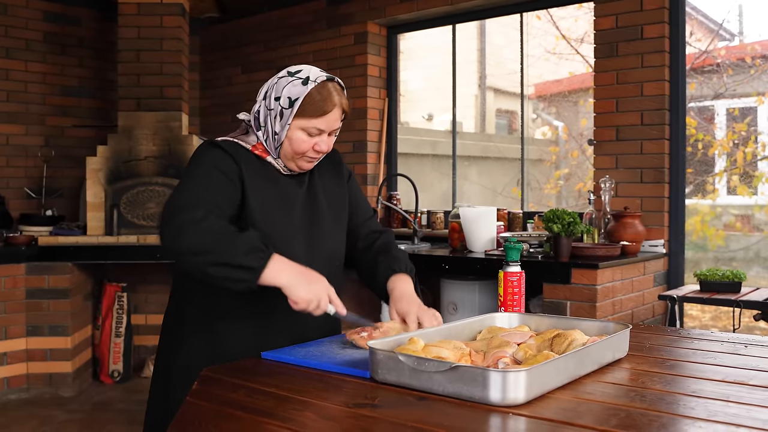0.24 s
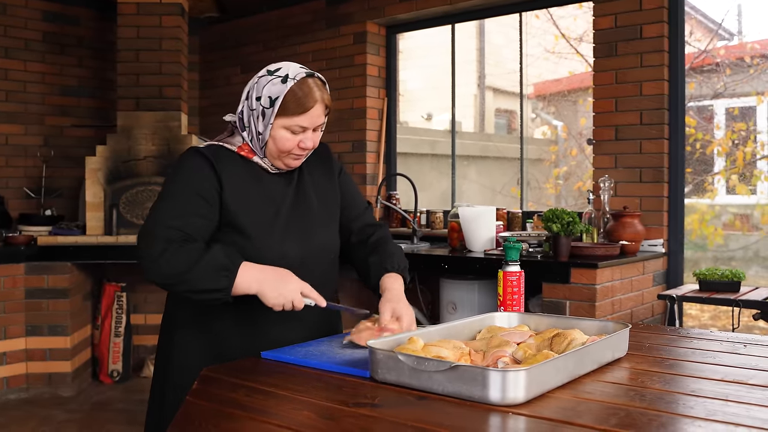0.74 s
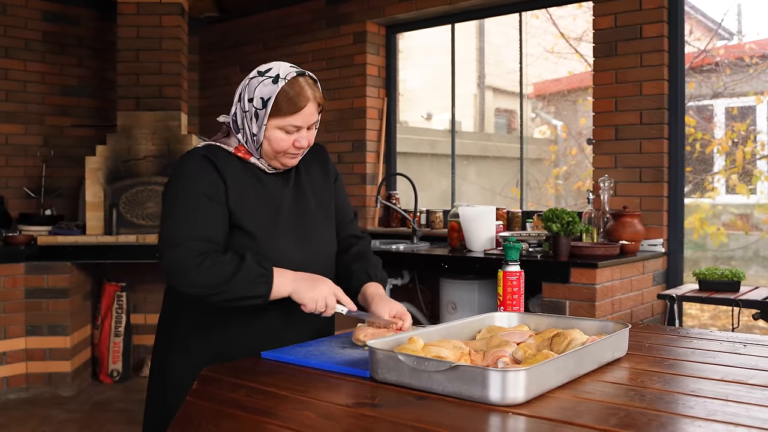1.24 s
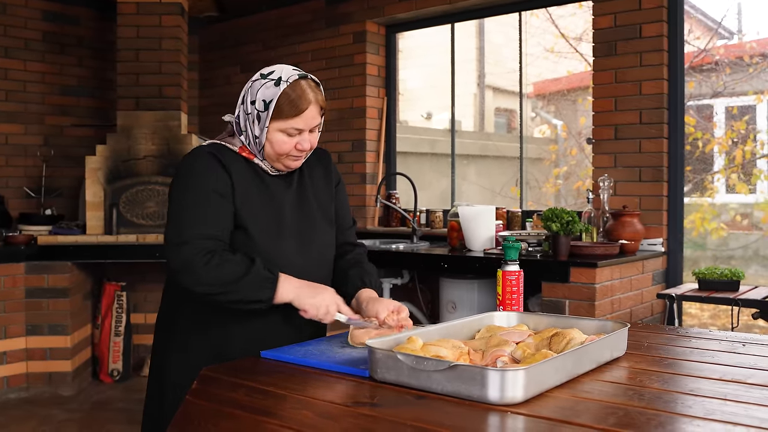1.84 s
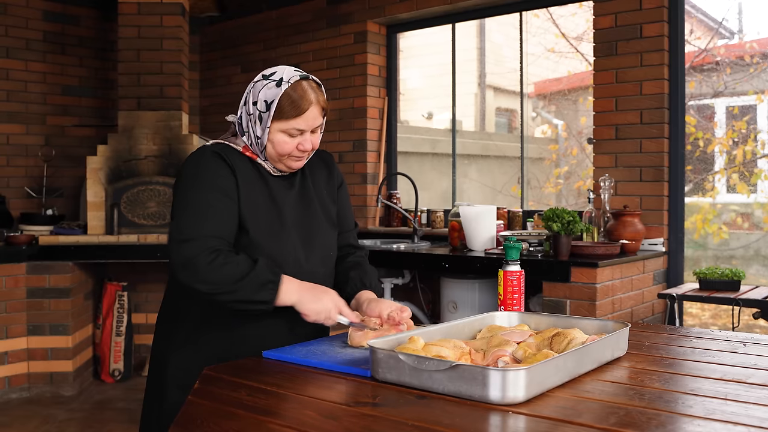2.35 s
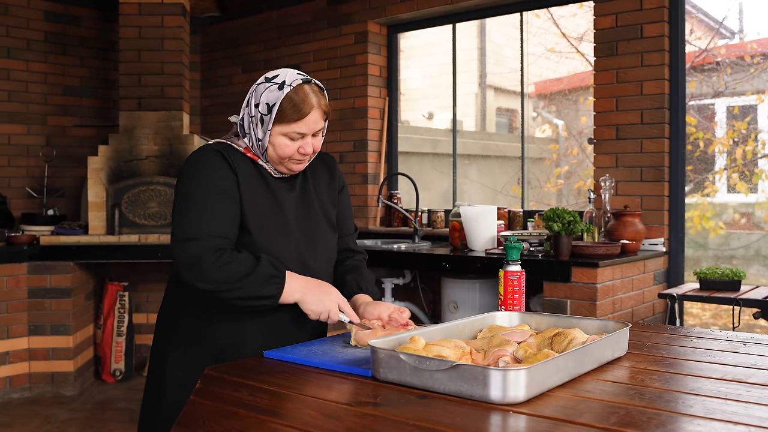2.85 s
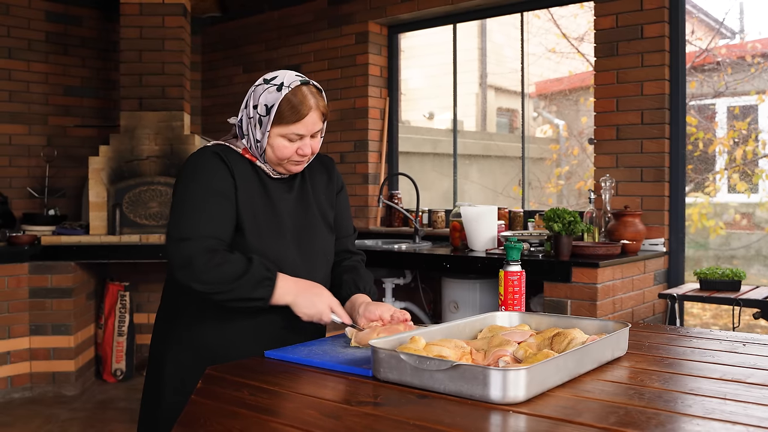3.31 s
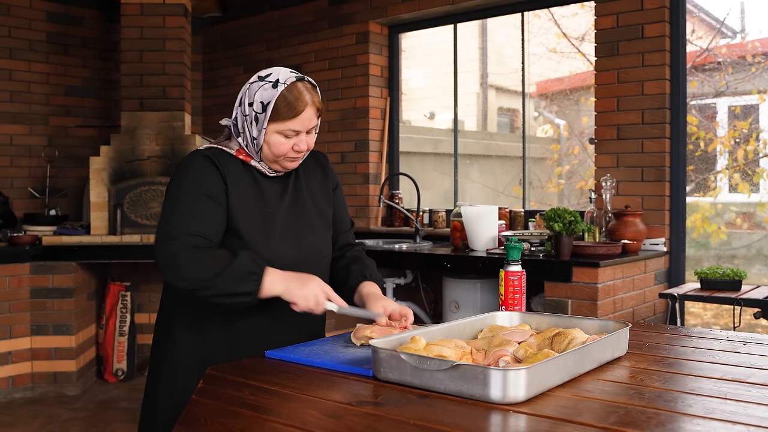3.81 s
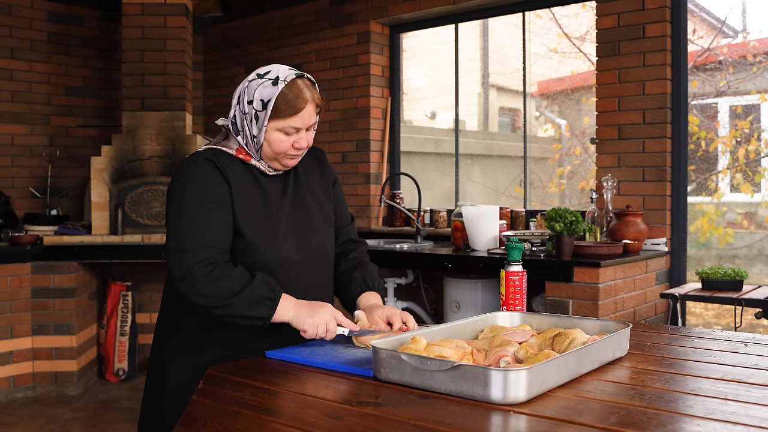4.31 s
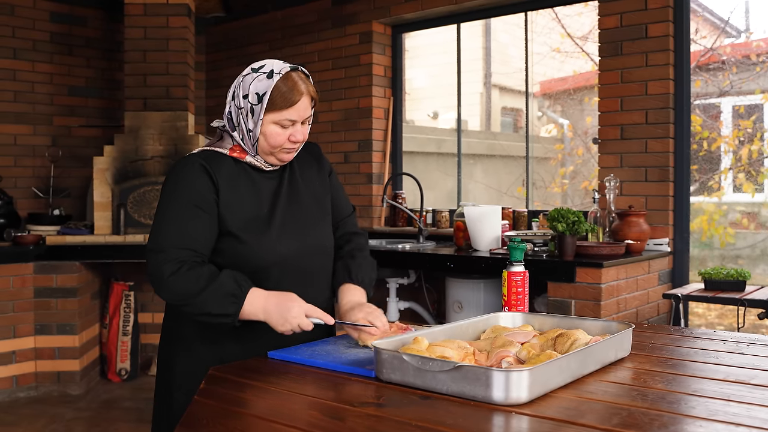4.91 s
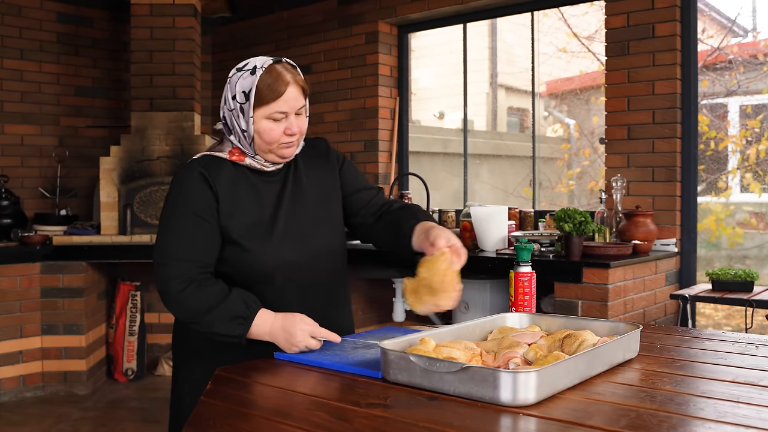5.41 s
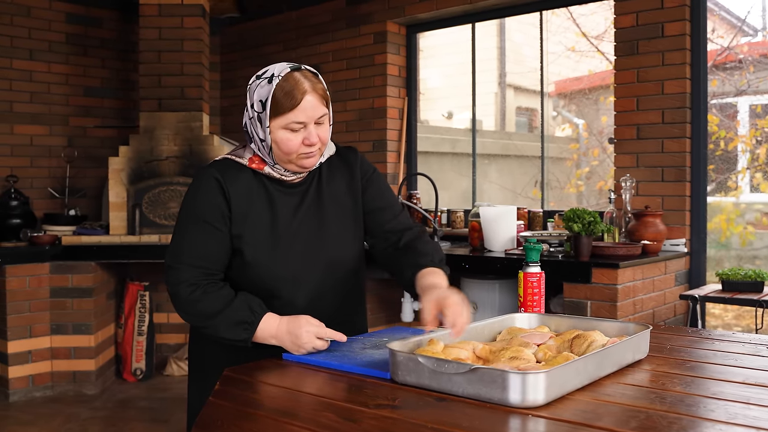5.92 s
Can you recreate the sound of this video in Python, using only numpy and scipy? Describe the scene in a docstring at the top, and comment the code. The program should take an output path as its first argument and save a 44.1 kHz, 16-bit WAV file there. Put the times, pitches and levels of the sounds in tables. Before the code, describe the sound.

Faint knife rasps, soft table thuds and moist ticks of raw meat, sparse birdsong and a far dog yelp, then one loud resonant tray knock.

```python
"""Raw chicken is trimmed on a board in a quiet brick summer kitchen: filtered noise for garden air and moist fizz.
From the start the knife rasps (grainy noise), the table thuds (damped modes) and wet skin ticks (noise snaps).
Meat then drags, birds chirp (gliding tones), and a far dog yelps twice (rough tones in hoarse noise).
Near the end a wet smack leads into the knock of the roasting tray on the table: a resonant crack with a bright
tick, echoes, ringing modes and room boom; then the tray settles with low thuds and scuffs."""
import sys
import numpy as np
from scipy import signal
from scipy.fft import rfft, irfft
from scipy.io import wavfile
from scipy.ndimage import uniform_filter1d

SR = 44100
rng = np.random.default_rng(int(sys.argv[2]) if len(sys.argv) > 2 else 0)


def generate_wav(sig):
    """Save sig (samples, or channels by samples) to the path in sys.argv[1] as 16-bit PCM at SR."""
    pcm = np.round(np.clip(np.atleast_2d(sig).T, -1, 1) * 32767).astype(np.int16)
    wavfile.write(sys.argv[1], SR, pcm)


N = 271636
T = np.arange(SR) / SR  # one second of time

# air and hiss spectrum: hz, relative_level_db
AIR_SPECTRUM = [(15, -49), (25, -48), (48, -5), (216, -6.5), (261, -2.5), (414, -7), (500, -4), (587, -6),
                (857, -6), (1040, -6.5), (1430, -7.5), (4330, -11), (5090, -15.5), (13100, -13.5),
                (15800, -15)]
# likeness of the air at the two ears: hz, correlation
AIR_LIKENESS = [(30, 0.43), (60, 0.29), (120, 0.81), (1000, 0.64), (2500, 0.27), (5000, 0.021),
                (9000, 0.025), (12000, 0.18), (14000, 0.99)]
# air balance: hz, left_minus_right_db
AIR_BALANCE = [(30, 6), (90, 0.5), (3000, 0), (6000, 1.5), (9500, 2.5), (14000, 0.8)]
# slow swell of the air: time_s, gain_db
AIR_SWELL = [(0, 1.5), (1.1, 1), (2, 2), (3.7, 1.86), (4.8, 0.6), (6.1, 1.8)]
AIR_DB = -64.5  # before the swell

# steady handling of wet meat: time_s, relative_fizz_db
HANDLING = [(0, -92), (1.1, -75), (1.7, -67.5), (3.7, -69.5), (4.1, -70.5), (4.65, -69.5), (4.85, -80),
            (5.55, -69), (6.1, -75)]

# knife strokes: start_s, length_s, rasp_level_db, relative_fizz_db
STROKES = [(0.056, 0.21, -70.5, -78), (0.378, 0.0049, -58.5, -76), (0.761, 0.11, -68.5, -62),
           (1.677, 0.13, -70.5, -62), (2.075, 0.11, -60.5, -66), (4.25, 0.17, -70, -77),
           (5.091, 0.05, -69.5, -61), (5.658, 0.094, -66, -78)]
BLADE_HZ, BLADE_OCTAVES = 3580, 0.31

# thuds of hand and meat, and after the knock of the settling tray:
# start_s, level_db, push_hz, damping_factor
THUDS = [(.076, -49.5, 113, 4), (.118, -51.5, 95, 4), (.485, -55.5, 100, 5.3), (.553, -55.5, 112, 1.9),
         (.588, -62, 202, 1.7), (1.078, -65, 120, 4), (1.121, -54.5, 119, 4.2), (1.146, -55.5, 123, 2.2),
         (4.88, -63, 140, 1.7), (6.072, -45.5, 138, .8), (6.106, -52, 207, 1.3), (6.141, -46, 90, 1)]
# table-top modes: hz, relative_level_db, undamped_t60_s
TABLE_MODES = [(84, -11, .3), (138, 2, .55), (200, 4, .3), (258, -5, .25), (318, -7, .25), (510, -16, .1)]

# larger ticks of skin and fat, and the bright tick of the knock: start_s, nominal_peak_db, centre_hz
LARGE_TICKS = [(0.2312, -49, 5440), (0.3192, -51, 8360), (0.4339, -53, 5920), (0.5038, -54, 4990),
               (0.6804, -52.5, 10100), (0.9555, -50, 10100), (1.022, -51, 12900), (1.5864, -51.5, 4030),
               (1.6334, -48.5, 5840), (2.4134, -49.5, 8600), (4.335, -46.5, 11500), (5.017, -49, 11400),
               (5.3258, -49, 12000), (5.5313, -50, 5730), (5.821, -47, 13500), (6.04, -49.5, 10500)]
SMALL_TICKS_PER_S, SMALL_TICK_DB, SMALL_TICK_SPREAD_DB, SMALL_TICK_HZ = 4.2, -54, 4, 8750

# meat dragged over the board or sliding in the tray:
# start_s, length_s, first_hz, last_hz, level_db, relative_fizz_db
DRAGS = [(.507, 0.093, 1190, 350, -61.5, -61), (0.585, 0.13, 190, 400, -64.5, -62),
         (2.827, .025, 1210, 1210, -66, -78), (3.663, 0.02, 2180, 2180, -63, -76),
         (3.902, 0.18, 478, 478, -68, -82), (6.028, 0.026, 520, 450, -49.5, -72),
         (6.102, 0.027, 560, 480, -52, -74)]
DRAG_OCTAVES = 0.83

# two-note bird calls: start_s, top_hz, first_level_db, link_length_s, second_hz, second_level_db
CHIRPS = [(.537, 4710, -68, .03, 3850, -68), (.748, 4300, -68, 0.029, 3900, -75),
          (.904, 4640, -67.5, 0.036, 3870, -66.5), (1.69, 4320, -72, .032, 3900, -72),
          (2.685, 4500, -72.5, .032, 3500, -71.5), (2.846, 5230, -65.5, 0.033, 3710, -65.5),
          (3.152, 4850, -70, .032, 3600, -71), (3.803, 5150, -64, .031, 3490, -61.5),
          (4.205, 4240, -69, .02, 3600, -75), (4.544, 5210, -63, .036, 3700, -68),
          (4.967, 5170, -67, .04, 3770, -66.5)]
# arch of the first note: time_s, share_of_top_pitch
ARCH = [(0, .9), (.006, .98), (.012, 1), (.026, .96), (.04, .88)]
LINK_DB, LINK_FROM, LINK_TO = -5, 1.1, .92  # level re second note; shares of its pitch
RISE_S, RISE_SHARE = 0.025, 0.0925  # second note climbs from this share below its pitch to as far above
CHIRP_ROUGH, CHIRP_WAVER = 0.34, .014  # roughness 0-1; pitch wander as a share
# single whistles and call fragments of other birds:
# start_s, length_s, first_hz, middle_hz, last_hz, level_db
WHISTLES = [(2.511, 0.12, 2040, 2074, 1630, -67.5), (3.148, 0.039, 1790, 1800, 1730, -72.5),
            (3.287, 0.066, 3150, 3030, 2970, -72), (3.356, .08, 3090, 3050, 2950, -73),
            (3.484, 0.02, 3430, 3400, 3330, -66.5), (3.484, 0.067, 2030, 2130, 2000, -70.5),
            (3.69, .048, 2880, 2430, 2230, -70.5), (3.735, 0.053, 2290, 2560, 2620, -71),
            (5.062, .024, 4620, 4560, 4400, -71)]
WHISTLE_ROUGH, WHISTLE_WAVER = .08, .005

# pieces of the far yelps: start_s, length_s, first_hz, middle_hz, last_hz, level_db,
# roughness_0_to_1, step_per_harmonic_db, haze_level_db
YELPS = [(2.18, 0.028, 792, 762, 740, -62, 0.3, -14, -68),
         (2.199, 0.028, 750, 684, 590, -57.5, 0.28, -12, -58.5),
         (2.222, 0.021, 720, 700, 680, -66, 0.5, -8, -63),
         (2.242, 0.018, 707, 668, 637, -57.5, 0.43, -14, -67),
         (2.271, .095, 701, 682, 660, -67.5, 0.55, -16, -77),
         (2.324, .05, 1400, 1470, 1430, -72, .3, -30, -78),
         (2.436, .028, 1217, 1183, 1170, -53.5, 0.23, -28, -65),
         (2.438, 0.038, 1467, 1437, 1380, -64, 0.3, -29, -75),
         (2.465, .042, 1257, 1224, 1190, -69, .6, -26, -71)]
# bands of the hoarse haze: centre_hz, width_octaves, relative_level_db
HAZE_BANDS = [(1290, 0.15, 1.5), (1900, .08, -6)]
# wall echoes of the yelps: delay_s, gain_db
YELP_ECHOES = [(.024, -15), (.048, -17)]

SLAP_LEAD_S, SLAP_DB, SLAP_HZ = .0055, -40.5, 3400  # wet meat touches the tray before the knock
KNOCK_S, KNOCK_DB = 5.8204, -10.5  # tray meets table; gain of the whole blow
# tray resonances in the crack: hz, width_hz, relative_level_db
CRACK_RESONANCES = [(213, 18, 0.5), (514, 26, 5.5), (790, 110, -10), (990, 150, 2), (1170, 130, 1),
                    (1480, 110, 0), (2190, 140, -2.5), (3100, 240, -28), (3900, 180, -20), (4380, 200, -13)]
# dead bands between them: hz, width_hz
CRACK_NOTCHES = [(1840, 80), (2690, 200)]
# reflections from table, floor and brick walls: delay_s, gain
KNOCK_ECHOES = [(.0046, 0.1), (.0072, 0.061), (0.0097, 0.15), (0.0147, 0.085), (.0255, 0.086), (.039, 0.11),
                (0.0432, 0.089), (.0605, .13), (.0645, .08), (0.0908, 0.056), (.1035, 0.059)]
# lingering tray modes: hz, relative_level_db, t60_s
TRAY_MODES = [(260, -42, .4), (322, -41, .35), (469, -31, .5), (488, -36, .3), (507, -32, .45),
              (534, -36, .25), (604, -35.5, .4), (621, -40, .3), (665, -43, .6), (753, -42, .5),
              (899, -43.5, .55), (955, -41, .4), (971, -35.5, .55), (994, -36.5, .42), (1030, -41, .45),
              (1059, -42, .5), (1118, -38, .55), (1160, -42, .6), (1187, -39, .5), (1237, -42, .55),
              (1248, -43, .5), (1305, -43, .5), (1320, -41, .65), (1392, -41, .55), (1454, -44, .6),
              (1521, -43, .45), (1534, -44, .55), (1982, -46, .5), (2005, -42.5, .5), (2218, -46, .33),
              (2295, -48, .5), (2635, -55, .55), (3105, -54, .55), (3560, -53, .55)]
# colour of the knock's reverberation: hz, relative_level_db
BOOM_COLOUR = [(47, -40), (75, -28), (112, -13), (145, -15), (175, -13), (240, -11), (350, -7), (510, 0),
               (574, -3.5), (680, -4), (820, -13), (990, -3.5), (1450, -9), (1800, -13.5), (2080, -10),
               (2550, -21.5), (3870, -16.5), (6140, -32.5), (12000, -40), (15600, -79), (22000, -120)]
# decay of the room: hz, t60_s
ROOM_DECAY = [(100, 0.67), (250, 0.66), (500, 0.58), (1200, 0.67), (2500, 0.66), (4500, 0.54), (9000, 0.24)]

# brief dip in level: start_s, end_s
DIP_SPAN = (1.149, 1.197)
# spectrum of the dip: hz, gain_db
DIP_SPECTRUM = [(200, -5), (1500, -5), (3800, -5.5), (6000, -21), (12000, -26)]
EDGE_HZ = 15900


def amp(db):
    """Decibels to amplitude."""
    return 10 ** (np.asarray(db) / 20)


def unit(x):
    """Scale to RMS 1."""
    return x / np.sqrt(np.mean(x ** 2) + 1e-24)


def read(points, hz):
    """Straight lines on a log-frequency axis."""
    f, value = np.transpose(points)
    return np.interp(np.log(hz + 1), np.log(f + 1), value)


def add(mix, start_s, sound):
    """Mix a sound in place, cut at the end of the mix."""
    part = mix[round(start_s * SR):][:len(sound)]
    part += sound[:len(part)]


def bins(size):
    """Frequencies of a real FFT in Hz."""
    return np.fft.rfftfreq(size, 1 / SR)


def bell_curve(size, hz, octaves):
    """Gaussian gain in log frequency."""
    return np.exp(-.5 * (np.log2((bins(size) + 1) / hz) / octaves) ** 2)


def band_noise(size, hz, octaves):
    """Noise under a bell curve, RMS 1."""
    spectrum = rfft(rng.standard_normal(size))
    return unit(irfft(spectrum * bell_curve(size, hz, octaves), size))


def high_pass(x, hz):
    """Steep cut of the deep bass."""
    return signal.sosfilt(signal.butter(4, hz, "high", fs=SR, output="sos"), x)


def tail(colour, rise_s):
    """Dense reflections of random sign, each band dying at its own speed; energy 1."""
    taps = rng.choice([-1., 1.], SR) * (rng.random(SR) < .2)
    hz, t, z = signal.stft(taps, SR, nperseg=512)
    decay_db = -60 * t / read(ROOM_DECAY, hz)[:, None]
    z = z * amp(read(colour, hz)[:, None] + decay_db)
    out = signal.istft(z, SR, nperseg=512)[1][:SR] * (1 - np.exp(-T / rise_s))
    return out / np.linalg.norm(out)


def in_room(x, wet_db, spread):
    """A sound with the brick room's answer, differing between the ears by spread."""
    colour = [(100, 0.5), (10000, 3.1)]  # hz, relative_level_db
    mid, side = (signal.fftconvolve(x, tail(colour, 0.0074))[:N] for _ in range(2))
    return x + amp(wet_db) * (mid + spread * np.array([side, -side]))


def ring(modes, damping=1):
    """Struck modes: sines dying away exponentially."""
    return sum(amp(db - 60 * T * damping / t60_s) * np.sin(2 * np.pi * hz * T) for hz, db, t60_s in modes)


def air(patch_db=1.02, flicker_db=0.77):
    """Garden air and hiss: shaped noise, its likeness at the ears set per band, its level flickering."""
    frames, hz = N // 128 + 5, bins(1024)
    a, b, c, d, patches = rng.standard_normal((5, frames, len(hz)))
    patches = uniform_filter1d(patches, size=16, axis=0)  # along time
    patches = unit(uniform_filter1d(patches, size=8, axis=1))  # along frequency
    flicker = unit(uniform_filter1d(rng.standard_normal((frames, 1)), size=10, axis=0))
    same = np.clip(read(AIR_LIKENESS, hz), -1, 1)
    left = a + 1j * b
    right = same * left + np.sqrt(1 - same ** 2) * (c + 1j * d)
    lean = amp(read(AIR_BALANCE, hz) / 2)
    z = np.array([left * lean, right / lean]) / np.sqrt((1 + same) / 2)
    z = z * amp(read(AIR_SPECTRUM, hz) + patch_db * patches + flicker_db * flicker)
    out = signal.istft(z.transpose(0, 2, 1), nperseg=1024, noverlap=896)[1][:, :N]
    swell_db = np.interp(np.arange(N) / SR, *np.transpose(AIR_SWELL))
    return out / out.mean(0).std() * amp(AIR_DB + swell_db)


def stroke_push(length_s):
    """The push of one stroke: quick rise, slower fade."""
    return np.sin(np.pi * np.linspace(0, 1, round(length_s * SR)) ** 0.52)


def wetness(clump_db=5.0, clump_s=0.012):
    """Strength of the fizz: clumped steady handling plus a surge with every stroke and drag."""
    window = np.hanning(round(2 * clump_s * SR))
    clumps = unit(signal.oaconvolve(rng.standard_normal(N), window, "same"))
    steady_db = np.interp(np.arange(N) / SR, *np.transpose(HANDLING))
    power = amp(steady_db + clump_db * np.minimum(clumps, 2)) ** 2
    for start_s, length_s, *_, fizz_db in STROKES + DRAGS:
        add(power, start_s, (amp(fizz_db) * stroke_push(length_s)) ** 2)
    return np.sqrt(power)


def squelch(level_db=-7.0, grains_per_s=2500, spread_db=3, hz=9500, octaves=0.64):
    """Countless films of moisture part as meat is pressed and pulled: random grains in a treble band."""
    grains = rng.standard_normal((3, N)) * (rng.random((3, N)) < grains_per_s / SR)
    grains = grains * amp(spread_db * np.minimum(rng.exponential(1, (3, N)), 2))
    shared, left, right = irfft(rfft(grains) * bell_curve(N, hz, octaves), N)
    out = np.array([shared + 0.71 * left, 0.5 * shared + .5 * right])
    return out / out.mean(0).std() * amp(level_db) * wetness()


def rub(length_s, first_hz, last_hz, octaves, count=4):
    """A rubbing stroke: noise crossfaded from colour to colour, grainy as the fibres give way."""
    push = stroke_push(length_s)
    place = np.linspace(0, count - 1, len(push))
    hiss = 0
    for k, hz in enumerate(np.geomspace(first_hz, last_hz, count)):
        fade = np.sqrt(np.maximum(1 - abs(place - k), 0))
        hiss = hiss + fade * band_noise(len(push), hz, octaves)
    fibres = np.exp(.3 * unit(uniform_filter1d(rng.standard_normal(len(push)), size=120)))
    return unit(hiss * fibres) * push


def knife():
    """The blade rasps: rubbing noise in one bright band."""
    out = np.zeros(N)
    for start_s, length_s, db, _ in STROKES:
        add(out, start_s, amp(db) * rub(length_s, BLADE_HZ, BLADE_HZ, BLADE_OCTAVES))
    return in_room(out, wet_db=-9.5, spread=0.14)


def thuds(ring_db=-9, push_s=0.014, rise_s=0.0062, smear_db=-17, smear_hz=240, smear_s=0.042, low_hz=60):
    """Hand and meat press on the table; after the knock the tray settles with low thuds.

    Each is a dull decaying push, a soft smear of noise and damped low table modes."""
    out = np.zeros(N)
    for start_s, db, hz, damping in THUDS:
        push = np.sin(2 * np.pi * hz * T) * np.exp(-T / push_s)
        smear = amp(smear_db) * band_noise(SR, smear_hz, 0.73) * np.exp(-T / smear_s)
        table = amp(ring_db) * ring(TABLE_MODES, damping)
        add(out, start_s, amp(db) * (table + push + smear) * (1 - np.exp(-T / rise_s)))
    return in_room(high_pass(out, low_hz), wet_db=-8.0, spread=0.056)


def ticks(decay_s=0.0018, crest_db=3.0, right_db=-2, spread=0.76):
    """Decaying noise bursts: snaps of wet skin and fat, the knock's bright tick, small ones at random."""
    out, t = np.zeros((2, N)), T[:768]
    all_ticks = list(LARGE_TICKS)
    for when, size, pitch in rng.random((120, 3))[:round(SMALL_TICKS_PER_S * N / SR)]:
        db = SMALL_TICK_DB + SMALL_TICK_SPREAD_DB * (2 * size - 1)
        all_ticks.append((when * N / SR, db, SMALL_TICK_HZ * 2 ** (pitch - .5)))
    for start_s, db, hz in all_ticks:
        snap, side = (band_noise(len(t), hz, 0.67) * np.exp(-t / decay_s) for _ in range(2))
        add(out[0], start_s, amp(db - crest_db) * (snap + spread * side))
        add(out[1], start_s, amp(db - crest_db + right_db) * (snap - spread * side))
    return out


def drags():
    """Dragged meat scuffs: broad rubbing noise, its colour sliding as the pressure changes."""
    out = np.zeros(N)
    for start_s, length_s, first_hz, last_hz, db, _ in DRAGS:
        add(out, start_s, amp(db) * rub(length_s, first_hz, last_hz, DRAG_OCTAVES))
    return in_room(out, wet_db=-9.5, spread=0.14)


def glide(length_s, first_hz, middle_hz, last_hz):
    """A parabola through three pitches."""
    curve = np.polyfit([0, .5, 1], [first_hz, middle_hz, last_hz], 2)
    return np.polyval(curve, np.linspace(0, 1, round(length_s * SR)))


def note(hz, rough, overtone_db, waver=0):
    """Three harmonics on a wavering pitch; strength and phase flutter with the roughness."""
    pole = np.exp(-2 * np.pi * 150 / SR)  # flutter mostly below 150 Hz
    flutter = signal.lfilter([1], [1, -pole], rng.standard_normal((3, len(hz))))
    turns = np.cumsum(hz * (1 + waver * unit(flutter[2]))) / SR
    shake = 1 - rough + rough * (unit(flutter[0]) + 1j * unit(flutter[1]))
    tone = sum(amp(k * overtone_db) * np.exp(2j * np.pi * (k + 1) * turns) for k in range(3))
    return unit((tone * shake).real) * signal.windows.tukey(len(hz), .3)


def birds(overtone_db=-39):
    """Nearly pure gliding tones: linked two-note chirps, single whistles and call fragments."""
    chirps, whistles, arch_s = np.zeros(N), np.zeros(N), ARCH[-1][0]
    arch = np.interp(T[:round(arch_s * SR)], *np.transpose(ARCH))
    rise = 1 + RISE_SHARE * np.linspace(-1, 1, round(RISE_S * SR))
    for start_s, top_hz, first_db, link_s, second_hz, second_db in CHIRPS:
        link = np.linspace(LINK_FROM, LINK_TO, round(link_s * SR))
        parts = [(0, top_hz * arch, first_db),
                 (arch_s, second_hz * link, second_db + LINK_DB),
                 (arch_s + link_s, second_hz * rise, second_db)]
        for after_s, hz, db in parts:
            add(chirps, start_s + after_s, amp(db) * note(hz, CHIRP_ROUGH, overtone_db, CHIRP_WAVER))
    for start_s, length_s, first_hz, middle_hz, last_hz, db in WHISTLES:
        hz = glide(length_s, first_hz, middle_hz, last_hz)
        add(whistles, start_s, amp(db) * note(hz, WHISTLE_ROUGH, overtone_db, WHISTLE_WAVER))
    return in_room(chirps, wet_db=-8.5, spread=1.0) + in_room(whistles, wet_db=-12, spread=1.0)


def dog():
    """Short broken far yelps: a pitched core in a hoarse haze, with quick echoes from walls."""
    out = np.zeros(N)
    for start_s, length_s, first_hz, middle_hz, last_hz, db, rough, overtone_db, haze_db in YELPS:
        core = note(glide(length_s, first_hz, middle_hz, last_hz), rough, overtone_db)
        size = len(core)
        haze = unit(sum(amp(band_db) * band_noise(size, hz, octaves) for hz, octaves, band_db in HAZE_BANDS))
        yelp = amp(db) * core + amp(haze_db) * haze * signal.windows.tukey(size, .5)
        add(out, start_s, yelp)
        for delay_s, echo_db in YELP_ECHOES:
            add(out, start_s + delay_s, amp(echo_db) * yelp)
    return in_room(high_pass(out, 400), wet_db=-13.5, spread=.1)


def slap(spread=0.29):
    """A brief wet smack: noise that grows until the tray is driven onto the table."""
    size, out = round(SLAP_LEAD_S * SR), np.zeros((2, N))
    mid, side = (band_noise(size, SLAP_HZ, 1.0) * np.linspace(.3, 1, size) for _ in range(2))
    add(out[0], KNOCK_S - SLAP_LEAD_S, mid + spread * side)
    add(out[1], KNOCK_S - SLAP_LEAD_S, mid - spread * side)
    return amp(SLAP_DB) * out


def causal(gain):
    """The most compact causal click with this spectrum (minimum phase), peak 1."""
    log_gain = np.log(np.maximum(np.r_[gain, gain[-2:0:-1]], 1e-5))
    click = np.fft.ifft(np.exp(np.conj(signal.hilbert(log_gain)))).real
    return click / abs(click).max()


def crack(soft_hz=3000, travel_s=0.00092):
    """The start of the blow: broad resonances with notches, smeared by dispersion; peak 1."""
    hz = bins(4096)
    body = sum(amp(db) / (1 + 1j * (hz ** 2 - f ** 2) / (width_hz * (hz + 1)))
               for f, width_hz, db in CRACK_RESONANCES)
    body = body * np.prod([(hz - f) / (hz - f + 1j * width_hz) for f, width_hz in CRACK_NOTCHES], axis=0)
    click = causal(abs(body) / np.sqrt(1 + (hz / soft_hz) ** 6))
    # bending waves carry treble through the metal ahead of the bass; travel_s is the delay at 1 kHz
    click = irfft(rfft(click) * np.exp(-4j * np.pi * travel_s * np.sqrt(1000 * hz)))
    return click / abs(click).max()


def knock(boom_db=11.0, tray_db=8, table_db=-29, low_hz=78, side_db=-31, chatter_db=-29, chatter_s=0.0052):
    """Tray on table: crack, first echoes, brief chatter of the rim, ringing modes and the room's boom."""
    direct = crack()
    chatter_shape = np.exp(-T / chatter_s) * (1 - np.exp(-T / 0.00039))
    chatter = amp(chatter_db) * band_noise(SR, 3400, 0.45) * chatter_shape
    tray = amp(tray_db) * ring(TRAY_MODES) * (1 - np.exp(-T / 0.0028))
    table = amp(table_db) * ring(TABLE_MODES) * (1 - np.exp(-T / 0.065))
    blow = chatter + tray + table
    add(blow, 0, direct)
    for delay_s, gain in KNOCK_ECHOES:
        add(blow, delay_s, gain * direct)
    blow = blow + amp(boom_db) * tail(BOOM_COLOUR, rise_s=0.017)
    side = amp(boom_db + side_db) * tail(BOOM_COLOUR, rise_s=0.0039)
    out = np.zeros((2, N))
    add(out[0], KNOCK_S, blow + side)
    add(out[1], KNOCK_S, blow - side)
    return amp(KNOCK_DB) * high_pass(out, low_hz)  # the knock carries little deep bass


def scene():
    """Sum of all sources, in order of first sound."""
    handling = squelch() + knife() + thuds() + ticks() + drags()
    return air() + handling + birds() + dog() + slap() + knock()


def record(dry):
    """The level dips briefly, the treble most; then a low-pass limits the band."""
    t = np.arange(N) / SR
    dull = irfft(rfft(dry) * amp(read(DIP_SPECTRUM, bins(N))), N)
    dip = uniform_filter1d(1. * ((t > DIP_SPAN[0]) & (t < DIP_SPAN[1])), size=60)
    low_pass = signal.firwin(511, EDGE_HZ, window=("kaiser", 9), fs=SR)
    return signal.oaconvolve(dry + dip * (dull - dry), low_pass[None], "same")


dry = scene()
out = record(dry)
generate_wav(out)
```